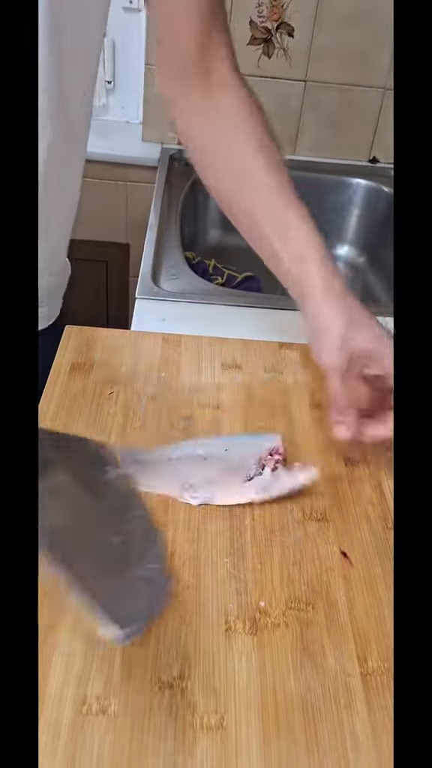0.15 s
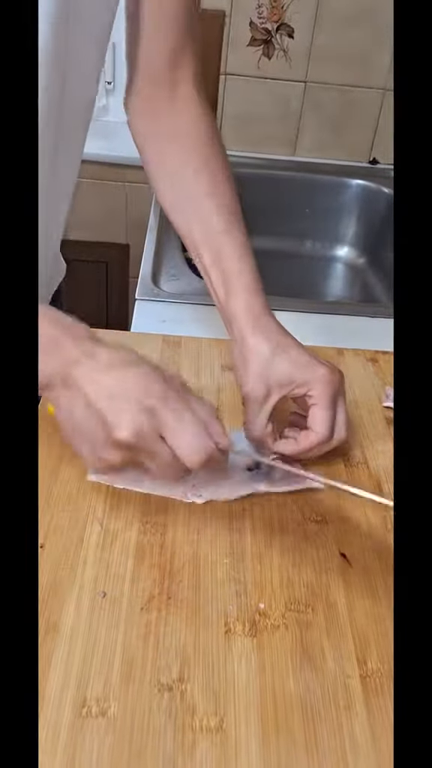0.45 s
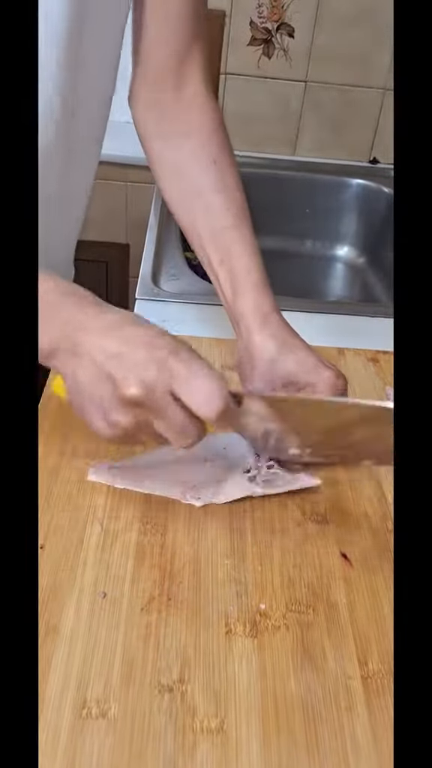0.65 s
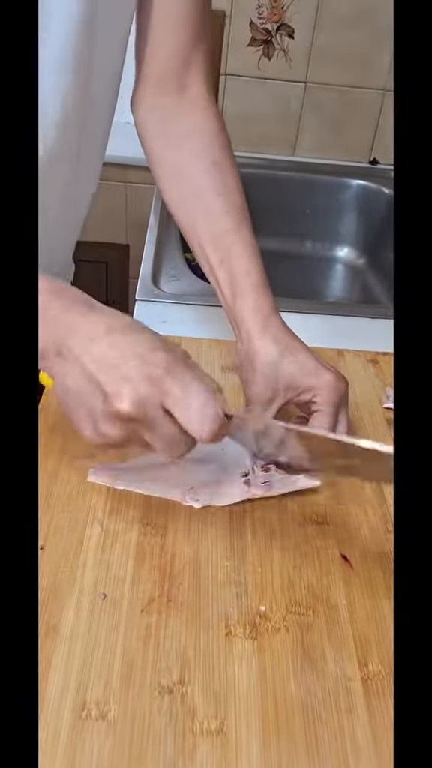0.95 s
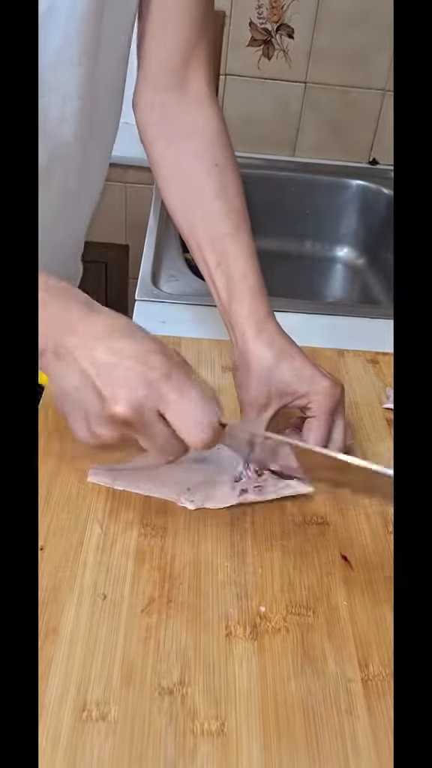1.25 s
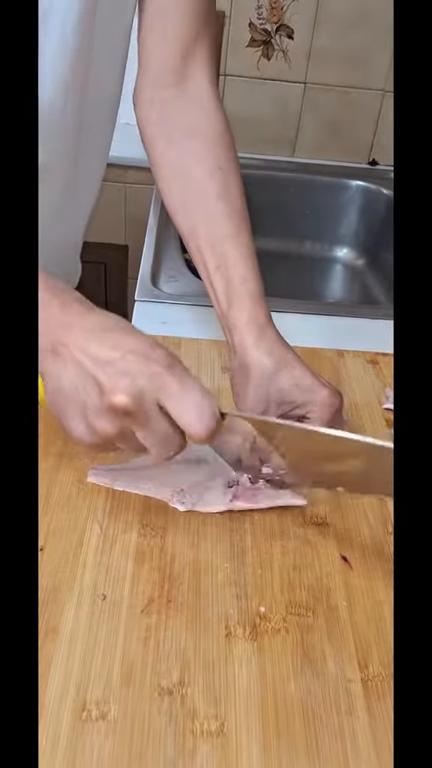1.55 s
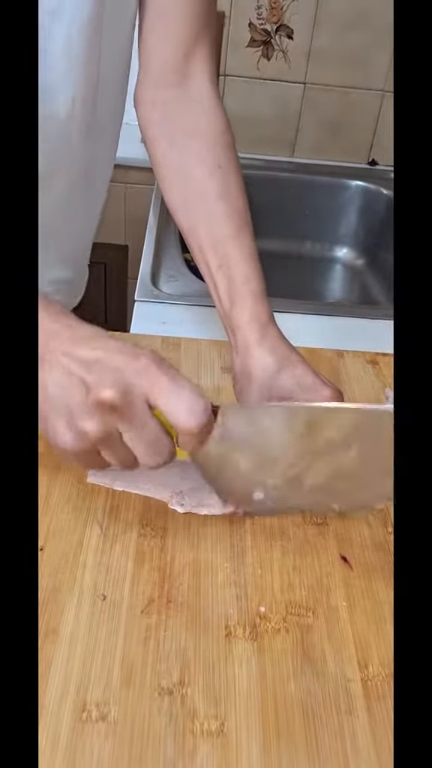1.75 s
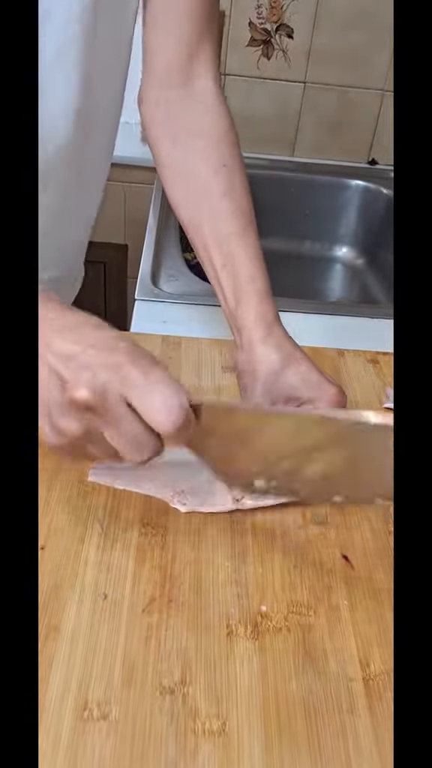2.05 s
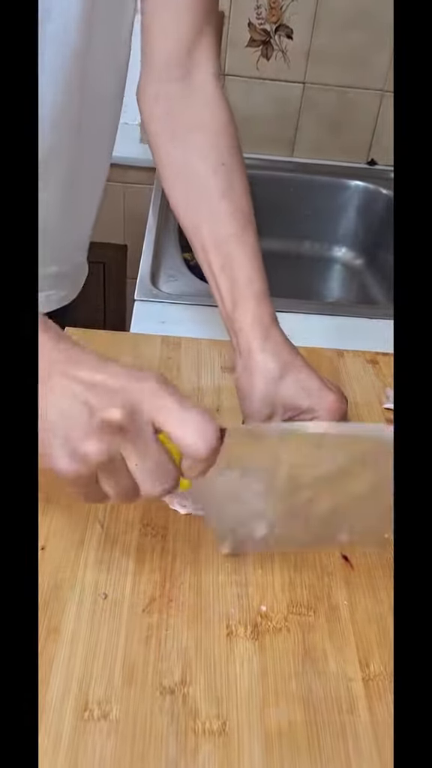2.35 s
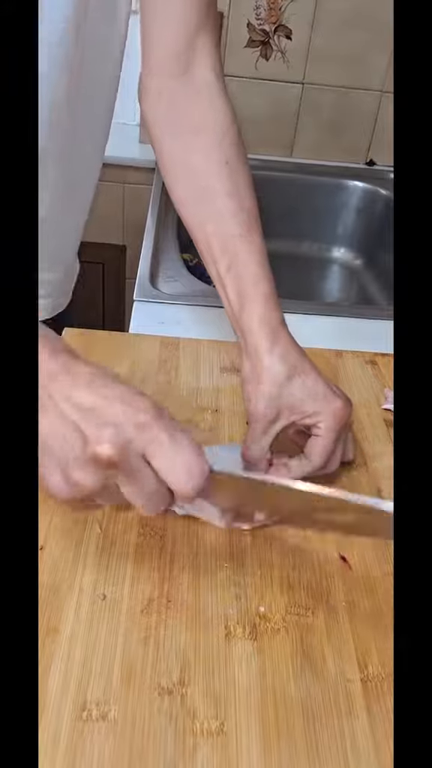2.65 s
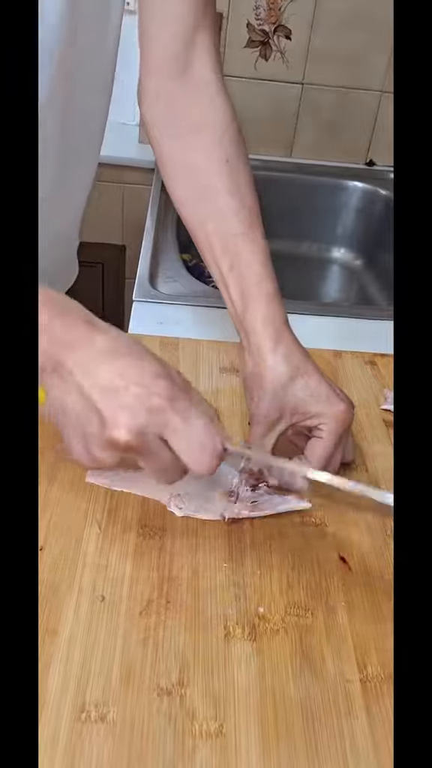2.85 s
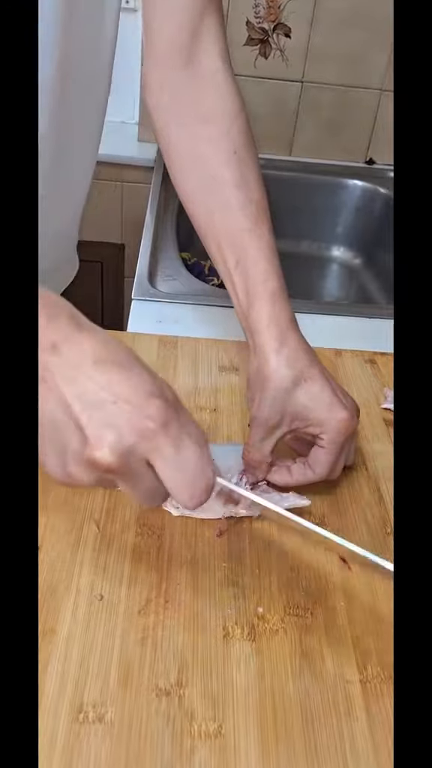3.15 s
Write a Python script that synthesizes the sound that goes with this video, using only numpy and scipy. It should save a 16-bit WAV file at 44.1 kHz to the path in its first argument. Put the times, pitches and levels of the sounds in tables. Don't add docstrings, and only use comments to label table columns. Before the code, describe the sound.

A broad knife rasps over a fish fillet, ticking and thudding onto a wooden board.

```python
import sys
import numpy as np
from scipy import signal
from scipy.fft import rfft, irfft
from scipy.io import wavfile
from scipy.ndimage import uniform_filter1d, map_coordinates

SR = 44100
rng = np.random.default_rng(int(sys.argv[2]) if len(sys.argv) > 2 else 0)


def persist_wave(psi):
    counts = np.round(np.clip(psi, -1, 1) * 32767).astype(np.int16)
    wavfile.write(sys.argv[1], SR, np.atleast_2d(counts).T)


def gain_from_db(level_db):
    decades = np.asarray(level_db, float) / 20
    return 10 ** decades


N = 145530

# start t/s, end t/s, first level/dB, last level/dB, treble/dB
STROKES = [(0.034, 0.116, -65.5, -46.5, 3), (0.365, 0.437, -61, -52.5, 1.5),
           (0.463, 0.531, -56.5, -43.5, 7), (0.705, 0.811, -53.5, -37, 4.5), (1, 1.089, -59, -38.5, 1),
           (1.078, 1.113, -36, -41.5, 3.5), (1.297, 1.434, -51, -41.5, 5), (1.488, 1.507, -51, -55.5, 7.5),
           (1.604, 1.641, -77.5, -37, -13), (1.64, 1.672, -50.5, -35.5, 7), (1.773, 1.832, -51.5, -49.5, 7),
           (1.888, 1.914, -78, -29, -7), (1.931, 1.965, -38.5, -45, 0.5), (2.163, 2.255, -51, -43, -7.5),
           (2.238, 2.27, -37.5, -40, 3), (2.268, 2.331, -33, -43.5, 4.5), (2.531, 2.581, -59.5, -56, 8),
           (2.582, 2.655, -40, -29, 1), (2.644, 2.742, -35, -63, -8), (2.75, 2.926, -59, -45.5, 2.5),
           (2.93, 3.01, -38.5, -36, -1.5), (3.003, 3.045, -25.5, -41, 0), (3.22, 3.3, -67.5, -43.5, 5)]
# f/Hz, level/dB per Hz
CRACK_COLOUR = [(240, -14), (400, -32.5), (714, -11.5), (2420, 1), (4120, -1.5), (6190, 5), (10900, -1),
                (14600, -4), (16800, -21)]
# f/Hz, level/dB, T60/s
BLADE = [(822, -3, .15), (1421, 0, .2), (1673, 5, .06), (1895, 8, .07), (2195, 8, .07), (2420, 8, .05),
         (2565, 7, .1), (2640, 4, .06), (3100, 3, .1), (3560, 10, .04), (4112, 0, .1), (5250, 6, .06),
         (6500, 4, .07)]
# f/Hz, level/dB, T60/s
WOOD = [(600, -7, .05), (760, -8, .05), (825, 0, .08), (1800, 8.5, .01), (2420, 6.5, .02)]
# f/Hz, level/dB, T60/s
TABLE = [(90, 0, .9), (118, 0, .5)]
# f/Hz, level/dB, T60/s
BOARD = [(138.1, -19, 0.56), (168.7, -27.5, 0.9), (191.9, -14.5, 0.25), (230.2, -11, 0.13),
         (258.5, -15.5, 0.084), (288, -19.5, 0.13), (257, -8.5, 0.039)]
SUSTAINED_TOP_HZ = 15900


def evened(x):
    return x / np.sqrt(np.mean(x ** 2) + 1e-20)


def read(points, hz):
    f, value = np.transpose(points)
    return np.interp(np.log(hz + 1), np.log(f + 1), value)


def add(mix, s, sound):
    part = mix[round(s * SR):][:len(sound)]
    part += sound[:len(part)]


def butter(x, order, hz, kind="low"):
    return signal.sosfilt(signal.butter(order, hz, kind, fs=SR, output="sos"), x)


def colour(x, points):
    level_db = read(points, abs(np.fft.fftfreq(4096, 1 / SR)))
    log_gain = np.log(gain_from_db(np.maximum(level_db, -100)))
    taps = np.fft.ifft(np.exp(np.conj(signal.hilbert(log_gain)))).real[:2048]
    taps = taps / np.linalg.norm(taps)
    if x.ndim > 1:
        taps = taps[None]
    return signal.oaconvolve(x, taps, axes=-1)[..., :N]


def tilt(x, treble):
    low = butter(x, 2, 4500)
    return low + treble * (x - low)


def ring(force, modes):
    t = np.arange(SR // 4) / SR
    taps = sum(gain_from_db(db - 60 * t / t60) * np.sin(2 * np.pi * hz * t) for hz, db, t60 in modes)
    return signal.fftconvolve(force, taps / np.linalg.norm(taps))[:N]


def patchy(x):
    hz, _, z = signal.stft(x, SR, nperseg=512)
    patches = uniform_filter1d(rng.standard_normal(z.shape), size=8, axis=0)
    patches = evened(uniform_filter1d(patches, size=8, axis=1))
    z = z * gain_from_db(2.1 * patches) * (hz < SUSTAINED_TOP_HZ)[:, None]
    return signal.istft(z, SR, nperseg=512)[1][:N]


def floor():
    # f/Hz, level/dB per Hz
    hiss_colour = [(18, -25), (30, 1), (50, 4.5), (124, -9.5), (844, -22.5), (1280, -28.5), (2480, -24),
                   (3490, -52), (4420, -25.5), (8000, -40), (15800, -38), (16000, -97)]
    t = np.arange(N) / SR
    hiss = gain_from_db(-62.5) * evened(colour(rng.standard_normal((2, N)), hiss_colour))

    whine_hz, width_hz, whine_end_s = 4620, 140, 0.275
    band = [whine_hz - width_hz / 2, whine_hz + width_hz / 2]
    whine = gain_from_db(-75.5) * evened(butter(rng.standard_normal((2, N)), 2, band, "band")) * (t < whine_end_s)

    tail_db, tail_t60 = -54, 0.9
    tail = gain_from_db(tail_db - 60 * t / tail_t60) * evened(butter(rng.standard_normal((2, N)), 4, 790))

    hum_hz, hum_db, hum_end_s = 148.6, -49.5, 0.016
    hum = gain_from_db(hum_db - 96 * np.maximum(t - hum_end_s, 0)) * np.sin(2 * np.pi * hum_hz * t)
    return hiss + whine + tail + hum


def gripped(force):
    # blade level/dB, wood level/dB
    grip = [(-16, -7), (-13, 6.5), (-8, -4), (-1.5, 4), (5, -12), (-0.5, -1.5), (3.5, -25), (0, 7), (7, 2),
            (9.5, 4), (7, 6.5), (3, -1), (0, 1.5), (2, -20), (-16, -6), (2.5, -7), (5, -5), (-6, -0.5),
            (-6, -12), (-3, 0), (-1, -5.5), (-5, -4), (-4, 3)]
    detune, spread_db = 0.012, 2
    blade_rasp_db, wood_rasp_db = -12, -10
    body = np.zeros(N)
    edges = [round(row[0] * SR) for row in STROKES] + [N]
    for a, b, (blade_db, wood_db) in zip(edges, edges[1:], grip):
        modes = []
        for hz, db, t60 in BLADE + WOOD:
            p, q = rng.standard_normal(2)
            modes.append((hz * (1 + detune * p), db + spread_db * q, t60))
        add(body, a / SR, gain_from_db(blade_rasp_db + blade_db) * ring(force[a:b], modes[:len(BLADE)]))
        add(body, a / SR, gain_from_db(wood_rasp_db + wood_db) * ring(force[a:b], modes[len(BLADE):]))
    return body


def rasp():
    # f/Hz, level/dB per Hz
    rasp_colour = [(260, -51), (450, -8), (826, 1.5), (1270, -12), (1890, 4), (2040, -0.5), (2510, 2),
                   (2700, 0), (15500, -10)]
    grit_per_s, grit_spread_db, grit_db = 810, 4.5, -8
    flicker_db, ease_s, rumble_db = 1.3, 0.0075, -5.5
    t, level, treble = np.arange(N) / SR, np.zeros(N), np.ones(N)
    for start, end, first_db, last_db, treble_db in STROKES:
        on = (t >= start) & (t < end)
        level[on] = gain_from_db(np.interp(t[on], [start, end], [first_db, last_db]))
        treble[on] = gain_from_db(treble_db)
    level = uniform_filter1d(level, int(ease_s * SR))

    hits = (rng.random(N) < grit_per_s / SR) * rng.choice([-1, 1], N)
    grit = hits * gain_from_db(grit_spread_db * np.minimum(rng.exponential(1, N), 4))
    slips = evened(rng.standard_normal(N) + gain_from_db(grit_db) * evened(grit))
    flicker = evened(uniform_filter1d(uniform_filter1d(rng.standard_normal(N), size=120), size=120))
    force = level * gain_from_db(flicker_db * flicker) * slips

    scrape = patchy(tilt(colour(force, rasp_colour), treble) + gripped(force))
    rumble = gain_from_db(rumble_db) * ring(force, TABLE[1:] + BOARD)
    return scrape, rumble


def snags():
    # t/s, level/dB, f/Hz
    snapping = [(0.0412, -45, 3040), (.409, -56, 2450), (0.425, -46, 2900), (0.471, -41, 2150),
                (0.5043, -33.5, 2530), (0.529, -42.5, 1800), (0.7513, -36, 2980), (1.0773, -30, 2520),
                (1.093, -30, 5000), (1.3849, -29, 2440), (1.408, -30, 2560), (1.633, -37, 3440),
                (1.6515, -27.5, 3500), (1.7867, -42, 2200), (1.806, -44, 2580), (1.818, -28.5, 2640),
                (1.9, -37, 3080), (2.1644, -50, 2620), (2.2357, -38, 3330), (2.27, -26, 3000),
                (2.2794, -24, 2180), (2.287, -39, 3560), (2.304, -41, 2980), (2.5724, -38, 4470),
                (2.5883, -37, 3300), (2.653, -38, 2480), (2.9283, -30.5, 2250), (3.2858, -46, 4000)]
    snap_t60, click_t60, click_db = 0.0045, 0.017, -3.5
    t, snap, click = np.arange(600) / SR, np.zeros(N), np.zeros(N)
    for s, db, hz in snapping:
        add(snap, s, gain_from_db(db - 60 * t / snap_t60) * rng.standard_normal(600))
        add(click, s, gain_from_db(db + click_db - 60 * t / click_t60) * np.sin(2 * np.pi * hz * t))
    return colour(snap, CRACK_COLOUR) + click


def ticks():
    # t/s, level/dB, treble/dB, ring level/dB, freed part of the blade f/Hz
    landings = [(0.0458, -19, -4, -11.5, 2420), (0.365, -40.5, -9, -3.5, 820),
                (.703, -29.5, 3, -10.5, 5250), (1.0031, -21, -0.5, -9, 6500),
                (1.2939, -23.5, -3.5, -19, 2340), (1.491, -42, 4, -3, 6500), (1.5777, -25.5, 2, -7.5, 2200),
                (1.6657, -15, -7.5, -5, 822), (1.8128, -41, -2, 3.5, 822), (1.8569, -20, 0, -8, 2420),
                (1.9154, -19.5, -5, -24, 1895), (2.184, -16.5, -4.5, -17, 2460),
                (2.3162, -26.5, -1.5, -2.5, 3100), (2.5293, -21.5, -9, -41, 3560),
                (2.6645, -7, -8, -14.5, 3560), (3.0070, -11.5, -11.5, -8, 2420),
                (3.0174, -11.5, -9.5, -4.5, 3560), (3.239, -39, 5, -2, 5250)]
    lead_s, lead_db, crack_t60, snap_db = 0.003, -17, 0.012, 4
    free_octaves, free_gain_db = 0.03, 8.5
    crack, blow, steel = np.zeros((3, N))
    treble = np.ones(N)
    t = np.arange(1600) / SR - lead_s
    crack_db = np.where(t < 0, lead_db + 4000 * t, -60 * t / crack_t60)
    for s, db, treble_db, ring_db, free_hz in landings:
        add(crack, s + 0.00097 - lead_s, gain_from_db(db + crack_db) * rng.standard_normal(1600))
        add(crack, s + 0.00074, gain_from_db([db + snap_db]))
        add(blow, s + 0.0008, gain_from_db([db + ring_db + 12.5]))
        free_modes = []
        for hz, level_db, t60 in BLADE:
            nearness = np.exp(-(np.log2(hz / free_hz) / free_octaves) ** 2)
            free_modes.append((hz, level_db + free_gain_db * nearness, t60))
        add(steel, s + 0.00054, ring(gain_from_db([db + ring_db + 11]), free_modes))
        treble[round((s - lead_s) * SR):] = gain_from_db(treble_db)
    return tilt(colour(crack, CRACK_COLOUR), treble) + steel + ring(blow, WOOD)


def thuds():
    # t/s, level/dB, second mode/dB, upper modes/dB, free swing/s
    weights = [(0.047, -51, 2.5, 13, 0.15), (0.424, -35, -26, -13, 0.045), (.466, -35, -5.5, -17, 0.055),
               (0.704, -28.5, -12, -15, 0.024), (0.741, -30.5, 0.5, -12, 0.049),
               (1.005, -36.5, -7, -6.5, 0.087), (1.295, -42.5, -7, -7, 0.15), (1.401, -38, -6, -2.5, 0.071),
               (1.58, -43.5, -2, -4.5, 0.19), (1.664, -43, 1, -1.5, 0.087), (1.855, -22.5, -5, -1.5, 0.087),
               (2.183, -32, -14, 4.5, 0.087), (2.051, -57, -12, 12, 0.067), (2.28, -45.5, -15, 7, 0.17),
               (2.37, -49, 7, -2, 0.029), (2.53, -32, -2, -5, 0.18), (2.666, -32.5, 2.5, 4, 0.12),
               (2.871, -41.5, -4, -12, 0.15), (3.006, -19, -8.5, -3, 0.079),
               (3.242, -43.5, -3.5, -8, 0.057)]
    table_rise_s, board_rise_s, detune = 0.0039, 0.0051, 0.02
    hand_db_per_s, hand_floor_db = -600, -21
    t, out = np.arange(SR // 2) / SR, np.zeros(N)
    modes = TABLE + BOARD
    rises = [table_rise_s] * len(TABLE) + [board_rise_s] * len(BOARD)

    puffs = evened(butter(rng.standard_normal((len(weights), len(t))), 2, [134, 352], "band"))
    body_level = gain_from_db(-15.5 - 60 * t / 0.4) + gain_from_db(-7.5 - 60 * t / 0.047)
    body_level = body_level * (1 - np.exp(-t / board_rise_s))

    for (s, db, second_db, upper_db, free_s), puff in zip(weights, puffs):
        hand_db = np.clip(hand_db_per_s * (t - free_s), hand_floor_db, 0)
        upper = list(upper_db + 3 * rng.standard_normal(len(modes) - 2))
        extra_db = [hand_db, hand_db / 2 + second_db] + upper
        thud = gain_from_db(upper_db) * body_level * puff
        for (hz, level_db, t60), more_db, rise_s in zip(modes, extra_db, rises):
            tuned_hz = hz * (1 + detune * rng.standard_normal() * hz / 90)
            swell = 1 - np.exp(-t / rise_s)
            thud += gain_from_db(level_db + more_db - 60 * t / t60) * swell * np.sin(2 * np.pi * tuned_hz * t)
        add(out, s, gain_from_db(db + 2.5) * thud)
    return out


def slap():
    # f/Hz, level/dB per Hz
    splat_colour = [(300, -3), (600, 5), (950, -1.5), (1700, -9), (2400, 5), (3600, -28), (4600, -6),
                    (12000, -5)]
    start_s, splat_db, splat_t60 = 0.06, -37, 0.29
    t = np.arange(N) / SR - start_s
    level = gain_from_db(splat_db - 60 * abs(t) / splat_t60) * (t > 0)
    return patchy(colour(level * rng.standard_normal(N), splat_colour))


def left_port(steel):
    lag_s, sway_s, sway_hz = 0.00002, 0.00006, 9.2
    t = np.arange(N) / SR
    rates = sway_hz * np.geomspace(0.2, 1, num=8)
    sway = evened(sum(np.sin(2 * np.pi * (hz * t + rng.random())) for hz in rates))
    return gain_from_db(-4) * map_coordinates(steel, [(t - lag_s - sway_s * sway) * SR], order=3)


def early_echoes(steel):
    # t/s, left level/dB, right level/dB
    echoes = [
        (.0012, -13.5, -19.5),
        (.0021, -36, -13.5),
        (.0045, -10, -37),
        (0.026, -9.5, -24.5),
    ]
    out = np.zeros((2, N))
    for s, left_db, right_db in echoes:
        add(out[0], s, gain_from_db(left_db) * steel)
        add(out[1], s * 1.2, gain_from_db(right_db) * steel)
    return out


def kitchen(x):
    # f/Hz, T60/s
    room = [(100, 0.41), (500, 0.46), (1500, 0.3), (4000, 0.32), (9000, 0.29), (16000, 0.19)]
    gap_s, spacing = 0.0043, 20
    taps = np.zeros((2, SR))
    at = np.arange(int(gap_s * SR), SR - spacing, spacing)
    at = at + rng.integers(0, spacing, (2, len(at)))
    np.put_along_axis(taps, at, rng.choice([-1., 1.], at.shape), 1)
    hz, t, z = signal.stft(taps, SR, nperseg=256)
    decay = gain_from_db(-60 * t / read(room, hz)[:, None])
    tail = signal.istft(z * decay, SR, nperseg=256)[1]
    return signal.fftconvolve(x[None], tail / np.linalg.norm(tail[0]), axes=1)[:, :N]


def scene():
    # f/Hz, left minus right level/dB
    ports = [(60, 8.5), (150, 1.5), (380, 0), (950, -2), (2380, -5.5), (5980, 1), (15000, -7.5)]
    steel_wet_db, wood_wet_db = -4.5, -2
    quiet = floor()
    scrape, rumble = rasp()
    steel = scrape + snags() + ticks() + slap()
    wood = rumble + thuds()

    direct = np.array([left_port(steel), steel]) + wood
    walls = butter(wood, 2, 145.4, "high")
    wet = early_echoes(steel) + kitchen(gain_from_db(steel_wet_db) * steel + gain_from_db(wood_wet_db) * walls)

    hz = np.fft.rfftfreq(N, 1 / SR)
    port = gain_from_db(read(ports, hz) / 2)
    both = rfft(direct) + rfft(wet) * (hz < SUSTAINED_TOP_HZ)
    return irfft(both * np.array([port, 1 / port]), N) + quiet


def top_cut(x):
    return signal.sosfilt(signal.butter(12, 16990, fs=SR, output="sos"), x)


def record(dry):
    side_low_hz, mic_low_hz, edge_hz = 460, 53.6, 16900
    hz = np.fft.rfftfreq(N, 1 / SR)
    shared = np.fft.rfft(dry[0] - dry[1]) / (1 + (hz / side_low_hz) ** 2)
    gap = np.fft.irfft(shared, N) / 4
    x = butter(dry + np.array([-gap, gap]), 2, mic_low_hz, "high")
    limit = signal.firwin(511, edge_hz, window=("kaiser", 9), fs=SR)
    x = signal.oaconvolve(x, limit[None], "same")
    return top_cut(x)


dry = scene()
out = record(dry)
persist_wave(out)
```